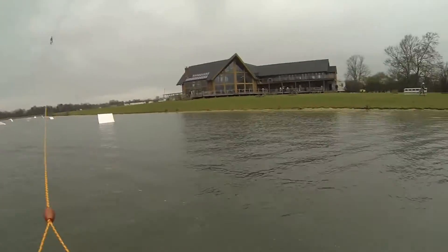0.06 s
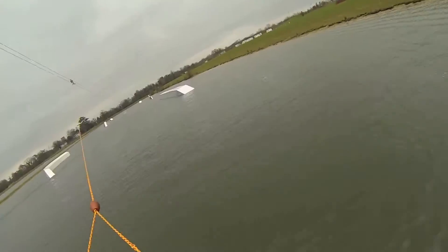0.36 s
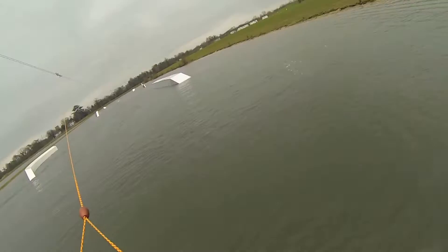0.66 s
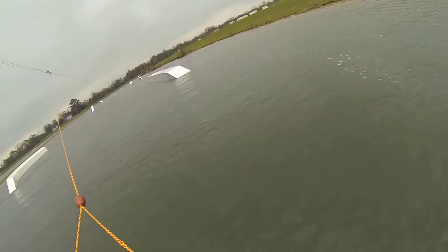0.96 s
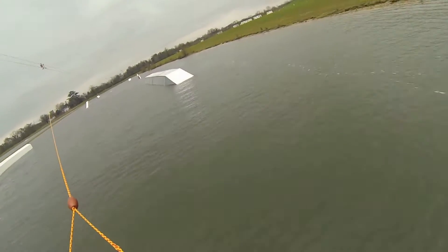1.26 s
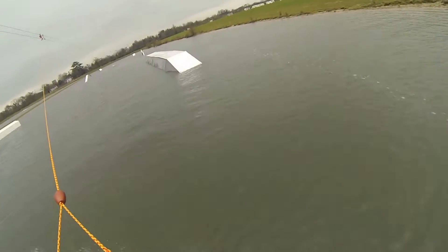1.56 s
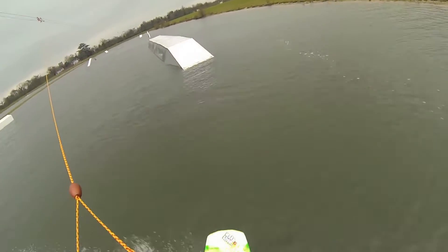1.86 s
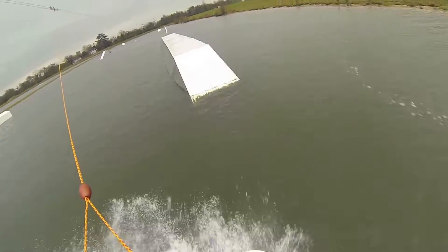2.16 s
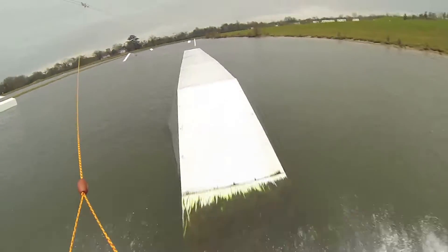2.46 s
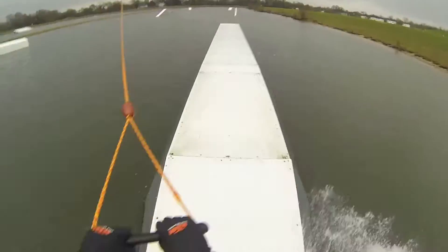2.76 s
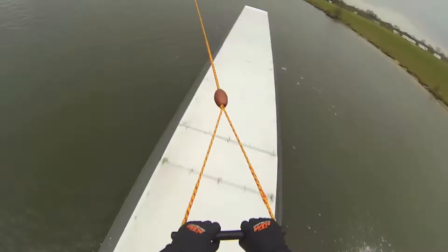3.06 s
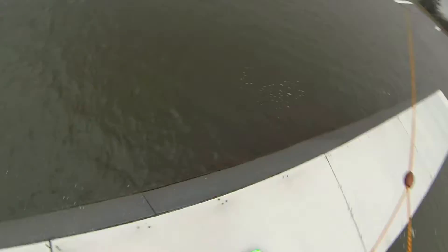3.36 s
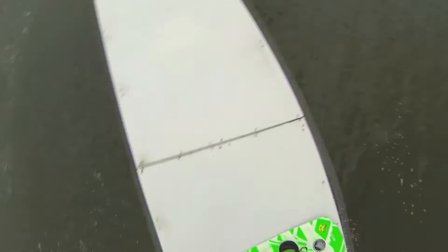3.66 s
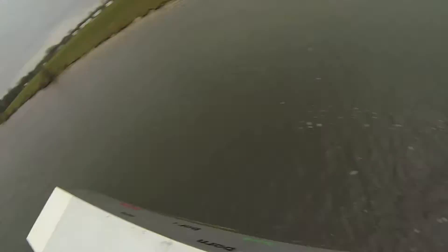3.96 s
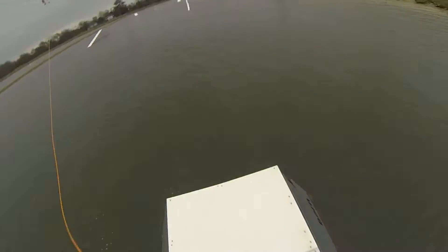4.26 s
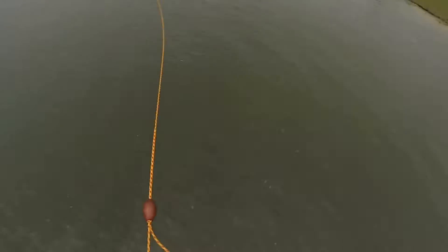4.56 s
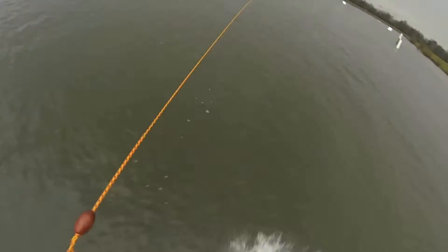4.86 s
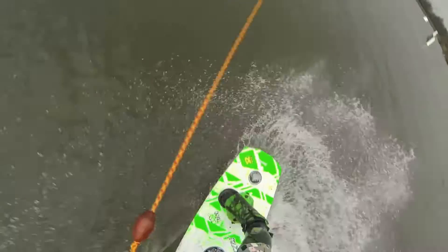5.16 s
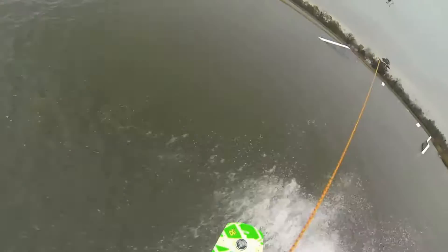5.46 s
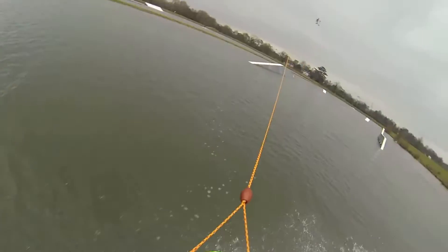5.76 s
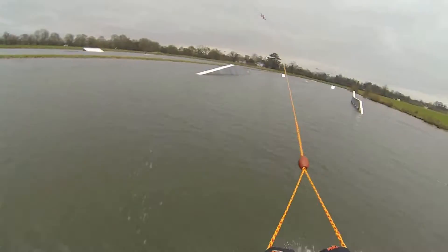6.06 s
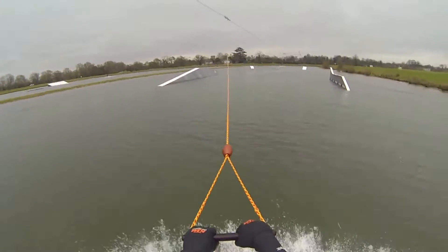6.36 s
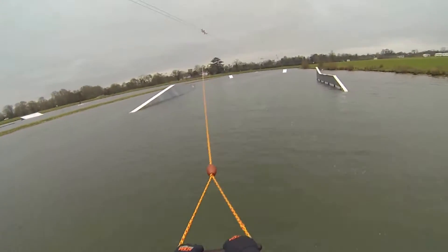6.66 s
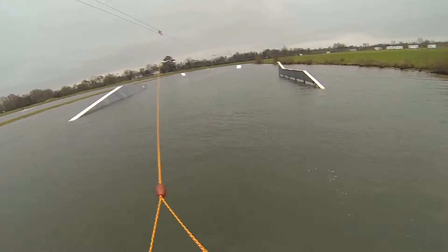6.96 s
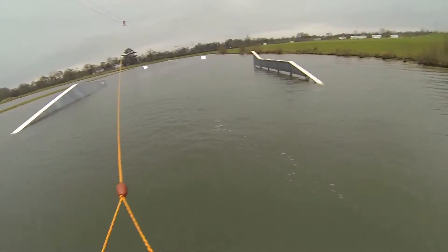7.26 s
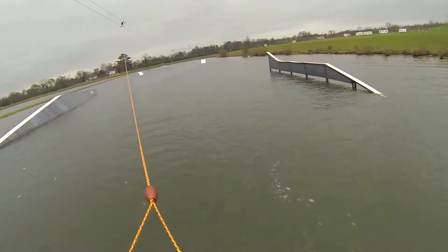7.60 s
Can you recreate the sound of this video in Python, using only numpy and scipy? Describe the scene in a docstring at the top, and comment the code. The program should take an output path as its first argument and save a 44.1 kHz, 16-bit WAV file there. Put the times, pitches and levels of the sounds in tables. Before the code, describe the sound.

Heard from a waterproof camera on the rider, wind rumbles throughout a wakeboard run on open water. Rushing spray, cut by one short early dip, gives way to irregular hollow clacks and a light scrape as the board slides over a ramp, with heavy, slightly crackling wind thumps. The board smacks down on the lake, water surges, and the hissing ride carries on.

```python
"""Wakeboard over a ramp

A cable-towed wakeboarder crosses a lake, slides along a plastic ramp and lands back on the water.
Spray hisses and water churns under the board; it knocks and scrapes over the hollow ramp, then slaps down.
Wind rumbles and thumps on the waterproof housing of the rider's camera, whose resonances colour the ride."""
import sys
import numpy as np
from scipy import signal
from scipy.fft import rfft, irfft
from scipy.io import wavfile
from scipy.ndimage import uniform_filter1d

SR = 44100
rng = np.random.default_rng(int(sys.argv[2]) if len(sys.argv) > 2 else 0)


def wav_record(signal):
    """Record a signal, one row per channel, as 16-bit PCM in the file named by sys.argv[1]."""
    frames = np.transpose(np.atleast_2d(signal))
    bounded = np.clip(frames, -1, 1)
    # unit amplitude maps onto the largest positive 16-bit level
    quanta = np.round(bounded * 32767).astype(np.int16)
    wavfile.write(sys.argv[1], SR, quanta)


N = 336483
TIME = np.arange(N) / SR
# cues: the board mounts the ramp, leaves its lip, lands and planes again
MOUNT_S, LIP_S, LANDING_S, PLANING_S = 2.705, 4.46, 4.781, 5.15

# fine spray thrown while planing, before and after the jump: time_s, level_db
SPRAY_BEFORE = [(0.36, -58.5), (0.98, -59), (2.05, -57), (2.19, -53.5), (2.68, -52.5)]
SPRAY_AFTER = [(5.16, -57), (5.63, -53), (5.93, -56.5), (6.42, -52.5), (6.76, -61), (7.6, -54)]
# how far the board is on its edge, from 0 (flat) to 1: time_s, edge_share
EDGING = [(1.9, 0.02), (2.3, 0.8), (2.7, 1), (5.15, 0.76), (6.45, 0.95), (6.7, 0.3), (7.2, 0.1)]
# thrown water showers back on the lake: peak_s, half_length_s, wash_db, fine_spray_db
SHOWERS = [(0, 0.057, -48.5, -46), (1.25, 0.42, -43.5, -64), (2.696, 0.016, -38, -45),
           (3.205, 0.35, -45, -51), (4.926, 0.043, -40.5, -56), (5.59, 0.23, -39.5, -56)]
# the board knocks on the ramp: start_s, clack_db, boom_db
KNOCKS = [(2.672, -33.5, -34), (2.951, -47, -46), (3.128, -21.5, -22.5), (3.163, -24, -40),
          (3.337, -38, -31.5), (3.449, -37, -46), (3.554, -34, -42), (3.625, -36.5, -41), (3.723, -40, -46),
          (3.84, -33, -36), (3.932, -33, -41), (4.347, -29, -38), (4.363, -27, -39), (4.423, -32, -61),
          (4.450, -34.5, -40)]
# the board digs in at the foot, bend and lip of the ramp: peak_s, half_length_s, level_db
DIGS = [(2.677, .025, -47), (3.346, 0.029, -41), (4.286, 0.077, -46.5)]
# water churning under the hull, before and after the jump: time_s, level_db
CHURN_BEFORE = [(0.4, -58.5), (0.44, -56), (2.41, -49.5), (2.62, -56)]
CHURN_AFTER = [(5.2, -51), (5.35, -62), (6.01, -66), (6.58, -48.5), (7.16, -71), (7.6, -48)]
# drops that strike the housing: start_s, level_db
DROPS = [(3.378, -27), (3.757, -47), (3.954, -26), (4.041, -29.5), (4.382, -20.5)]
# eddies that thump the housing: peak_s, pressure_db, half_width_ms
EDDIES = [(2.711, -2, 13), (2.765, -8, 3.9), (2.806, -3, 3.5), (3.019, -4.5, 8.6), (3.253, -7.5, 6.7),
          (3.339, -8.5, 1.15), (3.347, -8, 2), (3.376, -0.5, 6), (3.481, 0.5, 13.5), (3.651, -3.5, 4.4),
          (3.756, 0, 14.2), (3.871, 0.5, 14.5), (3.961, -4.5, 4.8), (4.054, -2, 16), (4.156, 0, 12),
          (4.256, -8, 8), (4.8162, 0.96, 2.9), (4.913, -13, 2.7), (4.956, -2.5, 11.7), (5.087, -4, 14.5)]
# strength of the wind on the housing: time_s, rumble_db, flutter_db
GUSTS = [(0, -28.5, -38.5), (.5, -28, -43), (1.3, -24.5, -41), (2.2, -26, -38.5), (2.7, -20, -49),
         (3.05, -25.5, -41), (3.3, -18.5, -38), (3.6, -20.5, -39), (3.95, -23.5, -32.5), (4.3, -18.5, -54),
         (4.6, -30, -40.5), (4.97, -24, -43.5), (5.25, -32.5, -45), (5.75, -25.5, -72), (6.1, -23, -43),
         (6.4, -29, -56), (6.8, -32, -41.5), (7.63, -28, -40.5)]

# resonances and notches: centre_hz, width_hz, gain_db
HOUSING_MODES = [(1487, 520, 8.5), (1807, 530, 3), (3012, 440, 6), (3560, 110, -1.5), (3960, 500, 2.5),
                 (4470, 270, -5.5), (4850, 460, 3), (5760, 490, 1.5), (8400, 580, 4.5), (10750, 730, 2.5),
                 (11500, 400, -2)]
SIDE_SPRAY_MODES = [(1600, 380, 5.5), (2060, 300, 10), (3170, 290, 7), (3460, 170, -5.5), (4310, 210, -6),
                    (5020, 1100, 6.5), (6900, 360, -2), (7360, 500, 5.5), (9150, 370, -1.5),
                    (9800, 530, 4.5), (10800, 710, 2.5)]
RAMP_MODES = [(273, 55, 9), (426, 60, 6), (840, 120, -5)]

# tone curve of each layer: frequency_hz, relative_db
WASH_EQ = [(300, -28.5), (700, -16.5), (1000, -10.5), (1300, 0), (1900, -0.5), (2500, -4.5), (3200, -6.5),
           (3800, -14), (6000, -23.5), (14000, -44)]  # midrange rush
MIST_EQ = [(1000, -25.5), (2500, -1.5), (3700, 6.5), (5000, -1.5), (6500, -2.5), (8200, -7), (9200, -11),
           (12000, -15.5), (14300, -17.5), (15500, -29)]  # bright hiss
FAN_EQ = [(700, -25), (1300, -15), (2000, -1.5), (3500, -4.5), (6000, -11.5), (9000, -18), (14200, -26),
          (15500, -40)]  # softer hiss
CLACK_EQ = [(300, -15.5), (700, -2.5), (1300, 3.5), (2000, -0.5), (3000, -19.5), (5000, -30), (12000, -58)]  # hard mids
BOOM_EQ = [(120, -6), (250, -7.5), (500, -8.5), (900, -11), (1500, -49), (5000, -80)]  # hollow lows
SMACK_EQ = [(150, 5), (290, -2.5), (470, 0), (900, -7.5), (1500, -5.5), (3000, -14), (4500, -26.5),
            (8000, -38.5), (14000, -61)]  # heavy slap
CHURN_EQ = [(100, -14.5), (200, -6), (300, 1.5), (400, -6.5), (650, -9), (1000, -9), (2000, -25.5),
            (6000, -61)]  # low gurgle
TICK_EQ = [(500, -14), (1300, -3), (2300, 1), (2950, 3.5), (3600, -11.5), (6800, -19), (9000, -30),
           (15000, -43)]  # sharp upper mids
CRACKLE_EQ = [(400, -5), (1500, -4.5), (3000, -1), (5000, -1), (8500, -12.5), (12000, -18), (15000, -38)]  # broad fizz
RUMBLE_EQ = [(8, -4.5), (16, 0), (26, 0), (42, -15.5), (65, -24), (100, -20), (200, -45.5), (600, -100)]  # sub-bass
FLUTTER_EQ = [(40, -0.5), (70, -15.5), (90, 1), (106, 3), (125, -16), (155, -20), (220, -17.5), (600, -62)]  # bass bump near 100 Hz


def spray(wash_db=-41.0, wash_follows=0.24, far_wash_db=-49, mist_db=7, fan_db=8.5):
    """Water falls back as a wash of drops; a flat board throws a fine mist, an edged one a fan of spray."""
    wash = colour(impacts(rate_hz=12000, spread_db=0.3), WASH_EQ, HOUSING_MODES)
    wash *= flicker(rate_hz=90, depth_db=0.5)
    mist = colour(impacts(rate_hz=15000, spread_db=-0.2), MIST_EQ, HOUSING_MODES)
    fan = colour(impacts(rate_hz=12000, spread_db=-0.5), FAN_EQ, SIDE_SPRAY_MODES)
    thrown, = faders(SPRAY_BEFORE + SPRAY_AFTER)
    edge = np.interp(TIME, *np.transpose(EDGING))
    shower_wash = sum(undb(db) * swell(peak_s, half_s) for peak_s, half_s, db, _ in SHOWERS)
    shower_fine = sum(undb(db) * swell(peak_s, half_s) for peak_s, half_s, _, db in SHOWERS)
    near_wash = undb(wash_db) * unit_rms(thrown) ** wash_follows * on_water(die_s=0.15, build_s=0.0091)
    wash_gain = np.sqrt(near_wash ** 2 + shower_wash ** 2 + undb(far_wash_db) ** 2)
    fine_gain = thrown * on_water(die_s=0.088, build_s=0.15)
    mist_gain = undb(mist_db) * np.sqrt(1 - edge) * fine_gain
    fan_gain = np.hypot(undb(fan_db) * np.sqrt(edge) * fine_gain, shower_fine)
    return flicker(rate_hz=28, depth_db=0.51) * (wash_gain * wash + mist_gain * mist + fan_gain * fan)


def ramp_knocks(clack_ms=9.4, boom_ms=14, strike=3.6):
    """Each blow is a hard strike and a short chatter of the board on the ramp, whose hollow body booms."""
    contact, body = np.zeros(N), np.zeros(N)
    for start_s, clack_db, boom_db in KNOCKS:
        add(contact, start_s, burst(clack_db, clack_ms, strike))
        add(body, start_s, burst(boom_db, boom_ms, 2 * strike))
    return colour(contact, CLACK_EQ, HOUSING_MODES) + colour(body, BOOM_EQ, RAMP_MODES)


def landing(smack_db=-23.5, hold_s=0.045, sag_db_per_s=200, flex_db=-23, flex_hz=375, flex_ms=20):
    """The board's underside meets the water in a short, dense smack, and the board rings as it bends."""
    contact = rise(LANDING_S, length_s=0.001) - rise(LANDING_S + hold_s, length_s=0.0085)
    envelope = contact * undb(smack_db - sag_db_per_s * np.maximum(TIME - LANDING_S, 0))
    smack = envelope * colour(impacts(rate_hz=7100, spread_db=1.0), SMACK_EQ, HOUSING_MODES)
    age_s = np.arange(SR // 10) / SR
    flex = np.sin(2 * np.pi * flex_hz * age_s) * np.exp(-1000 * age_s / flex_ms)
    add(smack, LANDING_S, undb(flex_db) * flex)
    return smack


def ramp_scrape(slide_db=-51, grit_db=-68):
    """The board rubs unevenly along the wet plastic, harder where the slope changes."""
    digs = sum(undb(db) * swell(peak_s, half_s) for peak_s, half_s, db in DIGS)
    rub_gain = undb(slide_db) * on_ramp() + digs
    rub = rub_gain * colour(impacts(rate_hz=5000, spread_db=2.5), WASH_EQ, HOUSING_MODES)
    grit = undb(grit_db) * on_ramp() * colour(impacts(rate_hz=500, spread_db=1.5), MIST_EQ, HOUSING_MODES)
    return (rub + grit) * flicker(rate_hz=40, depth_db=2.5)


def hull_churn(ramp_db=-48, floor_db=-57.0, plunge_db=-49):
    """Water churns under the hull and surges as the board sinks in; the low rush runs on over the ramp."""
    churn_gain, = faders(CHURN_BEFORE + CHURN_AFTER)
    plunge = undb(plunge_db) * swell(peak_s=4.95, half_s=0.097)
    afloat = churn_gain * on_water(die_s=0.072, build_s=0.024) + plunge
    envelope = np.hypot(afloat + undb(ramp_db) * on_ramp(), undb(floor_db))
    churn = colour(impacts(rate_hz=1500, spread_db=2.0), CHURN_EQ)
    return envelope * churn * flicker(rate_hz=30, depth_db=2.0)


def stray_drops(decay_ms=2.05):
    """Stray drops tick on the housing."""
    ticks = np.zeros(N)
    for start_s, level_db in DROPS:
        add(ticks, start_s, burst(level_db, decay_ms))
    return colour(ticks, TICK_EQ, HOUSING_MODES)


def wind_thumps(ring_hz=103, ring_share=0.77, leak_hz=12, overload_db=-12.5, knee=0.18, crackle_db=-44.5):
    """Each eddy is a peaked push that rings the housing; the microphone crackles while overloaded."""
    push = np.zeros(N)
    offset_s = np.arange(-4096, 4096) / SR
    for peak_s, pressure_db, half_width_ms in EDDIES:
        pulse = 1 / (1 + (1000 * offset_s / half_width_ms) ** 2 / 2) ** 2
        add(push, peak_s + offset_s[0], undb(pressure_db) * pulse)
    ring = signal.lfilter(*signal.iirpeak(ring_hz, Q=5, fs=SR), push)
    # suction comes before and after each push, so no steady pressure is left
    low_cut = signal.butter(1, leak_hz, "high", fs=SR, output="sos")
    thumps = signal.sosfiltfilt(low_cut, push + ring_share * ring)
    overload = np.tanh(np.maximum(thumps - undb(overload_db), 0) / knee)
    crackle = colour(impacts(rate_hz=10000, spread_db=5.0), CRACKLE_EQ, HOUSING_MODES)
    return thumps + undb(crackle_db) * overload * crackle


def wind_bed():
    """Turbulent air rumbles and shakes the housing near 100 Hz."""
    rumble_gain, flutter_gain = faders(GUSTS)
    rumble = rumble_gain * colour(noise(), RUMBLE_EQ) * flicker(rate_hz=7, depth_db=2.5)
    flutter = flutter_gain * colour(noise(), FLUTTER_EQ)
    return rumble + flutter


def level_dip(bottom_s=0.275, out_s=0.16, in_s=0.08, before_db=3, floor_db=-40):
    """The level fades briefly to almost nothing and comes back a little lower."""
    fade_out = undb(before_db) * (1 - rise(bottom_s - out_s, out_s))
    return np.maximum(fade_out + rise(bottom_s, in_s), undb(floor_db))


def duck(sound, threshold_db=-12, slope=1.21, release_db_per_s=60, attack_ms=6, split_hz=220):
    """Loud peaks pull down all but the bass a moment later; the gain creeps back at a steady rate."""
    over_db = np.maximum(20 * np.log10(np.abs(sound[0]) + 1e-9) - threshold_db, 0)
    recovery_db = release_db_per_s * TIME
    cut_db = np.maximum.accumulate(slope * over_db + recovery_db) - recovery_db
    lag = signal.bessel(4, 1000 / (2 * attack_ms), fs=SR, output="sos")
    bass = signal.sosfiltfilt(signal.butter(2, split_hz, fs=SR, output="sos"), sound)
    return bass + (sound - bass) * undb(-signal.sosfilt(lag, cut_db))


def on_water(die_s, build_s):
    """An envelope that dies away on the ramp and builds from the landing until the board planes."""
    leaving = np.exp(-np.maximum(TIME - MOUNT_S, 0) / die_s)
    returning = np.exp(np.minimum(TIME - PLANING_S, 0) / build_s)
    return np.where(TIME < LANDING_S, leaving, returning)


def on_ramp(fade_s=0.022):
    """A gate that is open while the board slides on the ramp."""
    return rise(MOUNT_S, fade_s) - rise(LIP_S, fade_s)


def rise(start_s, length_s):
    """A straight fade from 0 to 1."""
    return np.clip((TIME - start_s) / length_s, 0, 1)


def swell(peak_s, half_s):
    """A bell-shaped swell."""
    return np.exp(-((TIME - peak_s) / half_s) ** 2)


def faders(table):
    """One gain curve for each dB column of a timed table."""
    times_s, *columns_db = np.transpose(table)
    return [undb(np.interp(TIME, times_s, levels_db)) for levels_db in columns_db]


def flicker(rate_hz, depth_db):
    """A gain that wanders at random, about rate_hz times a second."""
    step = max(int(SR / rate_hz), 1)
    held = np.repeat(noise()[:N // step + 1], step)
    smooth = uniform_filter1d(uniform_filter1d(held, step), step)[:N]
    return undb(depth_db * unit_rms(smooth))


def impacts(rate_hz, spread_db):
    """Tiny impacts at random moments, many small and a few large."""
    strength = undb(spread_db * np.minimum(rng.exponential(size=N), 5))
    hits = rng.random(N) < rate_hz / SR
    return unit_rms(hits * strength * noise())


def burst(level_db, decay_ms, strike=0, size=8192):
    """Dense chatter that dies away, led by an optional one-sample strike."""
    age_ms = 1000 * np.arange(size) / SR
    chatter = rng.standard_normal(size) * np.exp(-age_ms / decay_ms)
    chatter[0] = strike
    return undb(level_db) * chatter


def colour(sound, eq, modes=(), size=16384):
    """Shape a sound with a tone curve plus resonances; white noise keeps its level."""
    hz = np.maximum(np.arange(size // 2 + 1) * SR / size, 1)
    eq_hz, eq_db = np.transpose(eq)
    curve_db = np.interp(np.log(hz), np.log(eq_hz), eq_db)
    for centre_hz, width_hz, gain_db in modes:
        curve_db += gain_db / (1 + (2 * (hz - centre_hz) / width_hz) ** 2)
    # minimum phase: the ringing follows each hit and never precedes it
    cepstrum = irfft(np.log(undb(curve_db)))
    cepstrum[1:size // 2] *= 2
    cepstrum[size // 2 + 1:] = 0
    response = irfft(np.exp(rfft(cepstrum)))
    return signal.oaconvolve(sound, response / np.linalg.norm(response))[:N]


def add(track, start_s, sound):
    """Mix a short sound into a track."""
    start = int(start_s * SR)
    track[start:start + len(sound)] += sound[:N - start]


def noise():
    """White noise."""
    return rng.standard_normal(N)


def undb(db):
    """Decibels to gain."""
    return 10 ** (np.asarray(db) / 20)


def unit_rms(sound):
    """Scale to rms 1."""
    return sound / np.sqrt(np.mean(sound ** 2))


def scene():
    """Water, wind and board in mono, heard from the rider's position."""
    water = spray() + hull_churn()
    air = wind_bed() + wind_thumps()
    ramp = ramp_scrape() + ramp_knocks()
    return (water + air + ramp + stray_drops() + landing())[None]


def record(dry, top_hz=15300):
    """The level dips once near the start; thumps duck the mix, peaks clip and the top is cut."""
    clipped = np.clip(duck(dry * level_dip()), -1, 1)
    high_cut = signal.ellip(8, 0.2, 70, top_hz, fs=SR, output="sos")
    return signal.sosfilt(high_cut, clipped)


dry = scene()
out = record(dry)
wav_record(out)
```